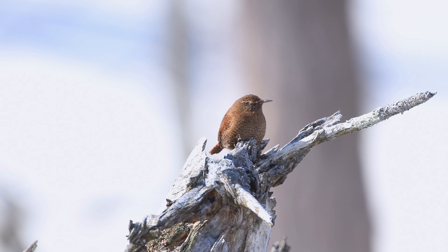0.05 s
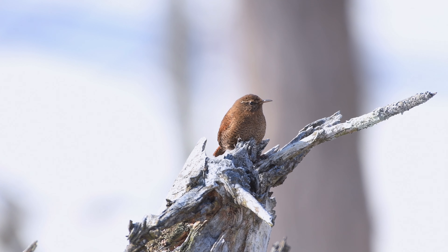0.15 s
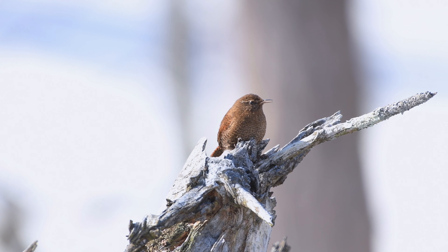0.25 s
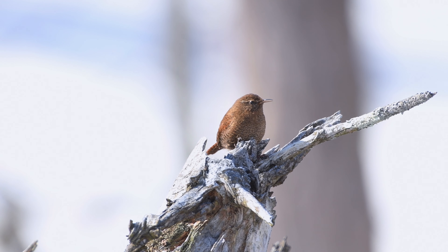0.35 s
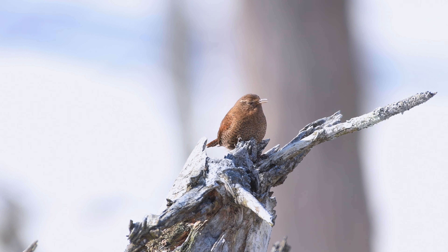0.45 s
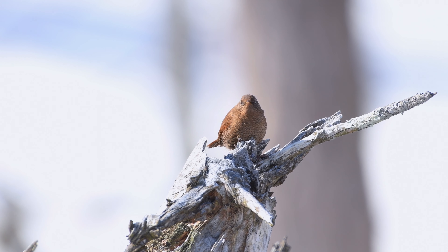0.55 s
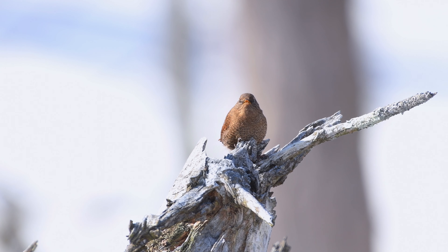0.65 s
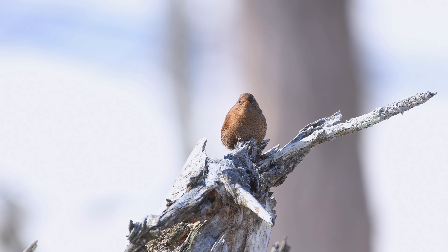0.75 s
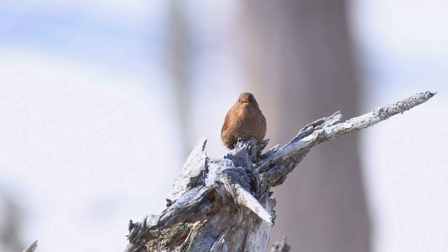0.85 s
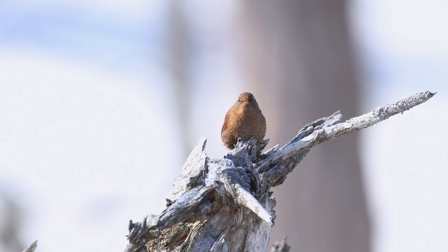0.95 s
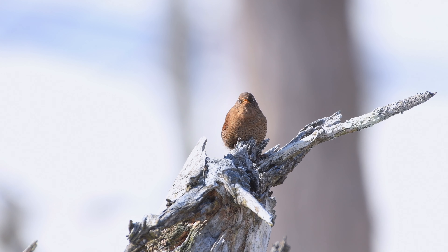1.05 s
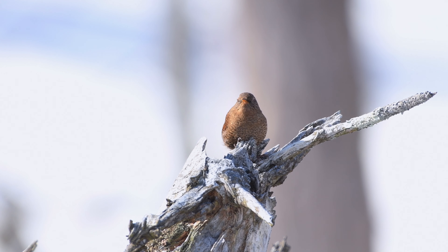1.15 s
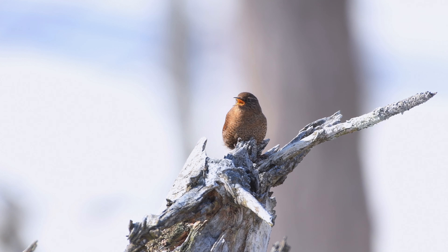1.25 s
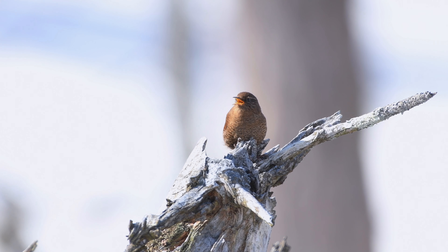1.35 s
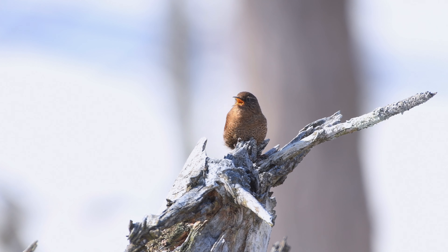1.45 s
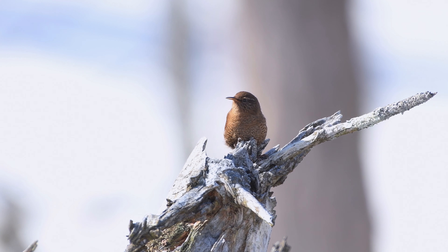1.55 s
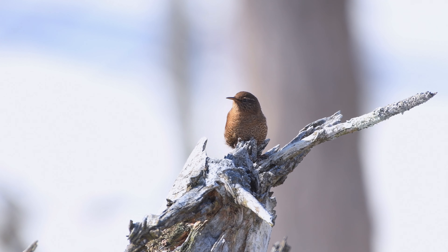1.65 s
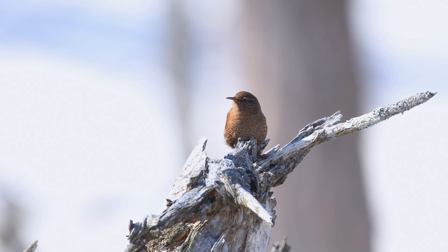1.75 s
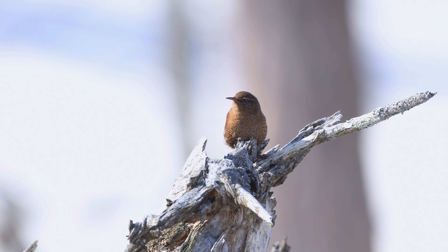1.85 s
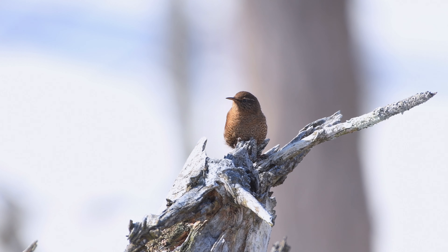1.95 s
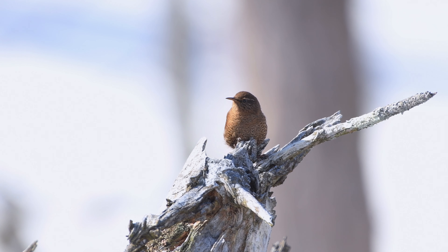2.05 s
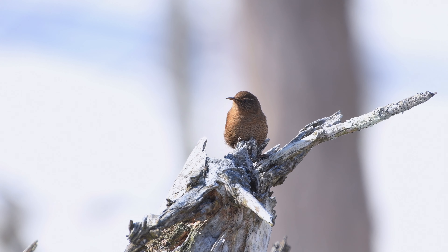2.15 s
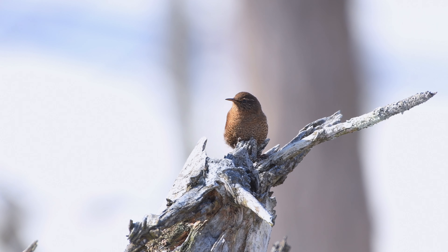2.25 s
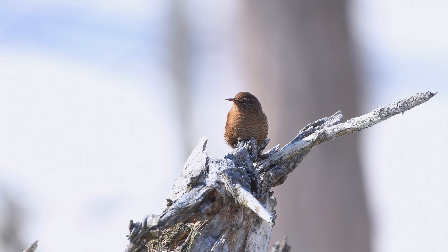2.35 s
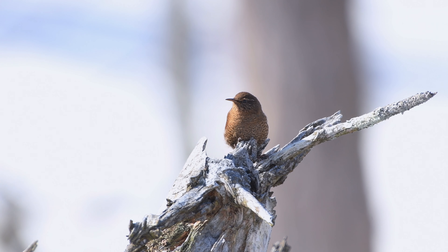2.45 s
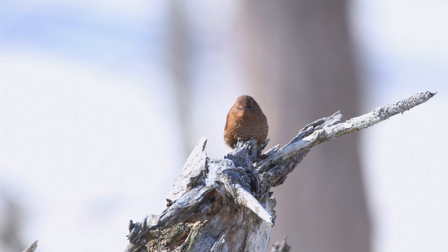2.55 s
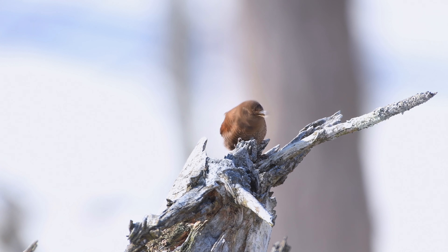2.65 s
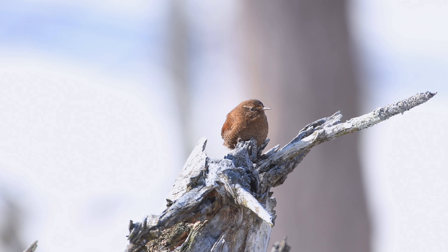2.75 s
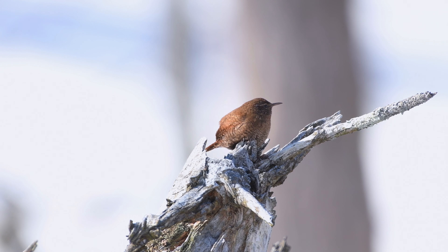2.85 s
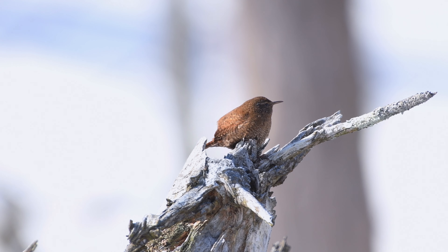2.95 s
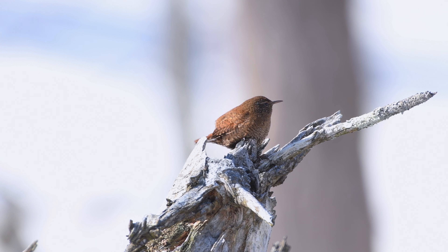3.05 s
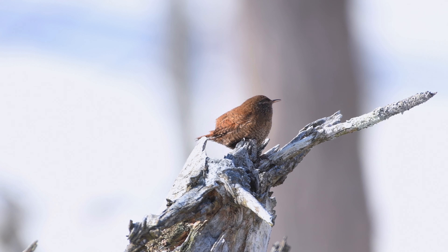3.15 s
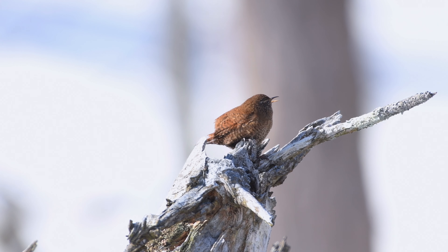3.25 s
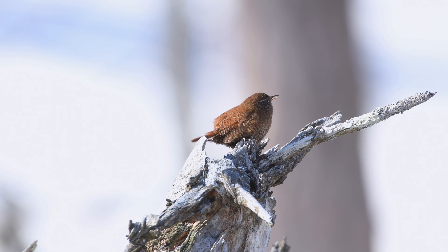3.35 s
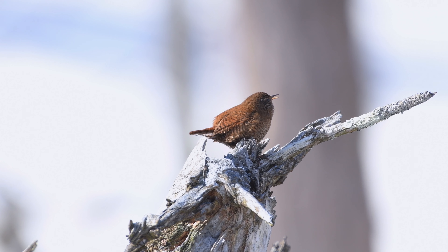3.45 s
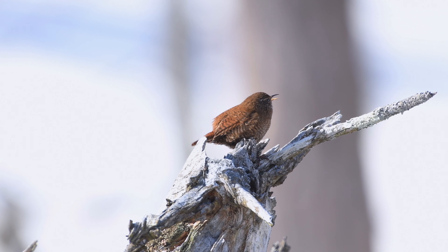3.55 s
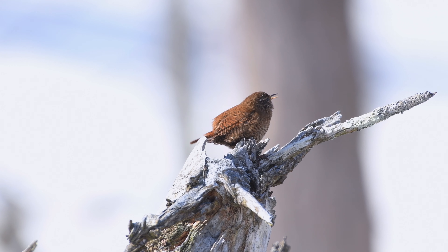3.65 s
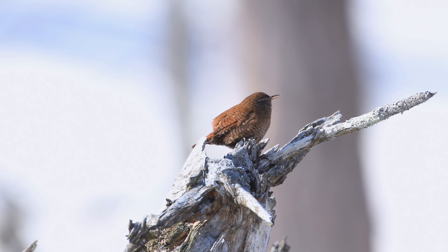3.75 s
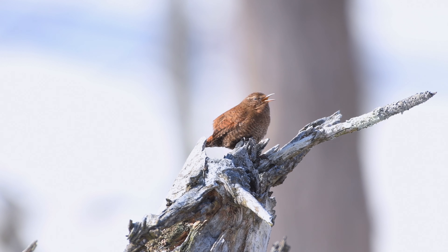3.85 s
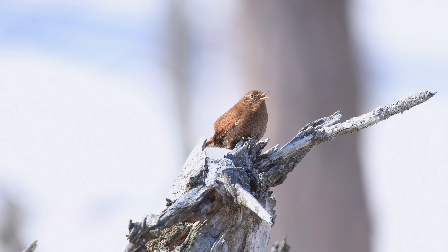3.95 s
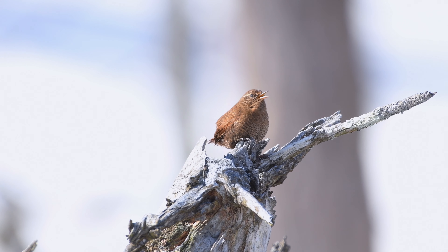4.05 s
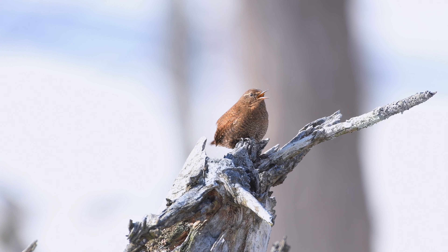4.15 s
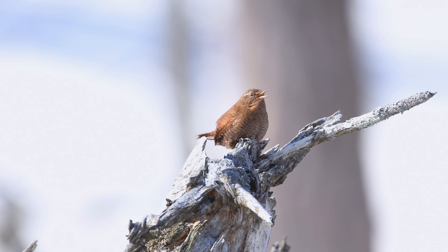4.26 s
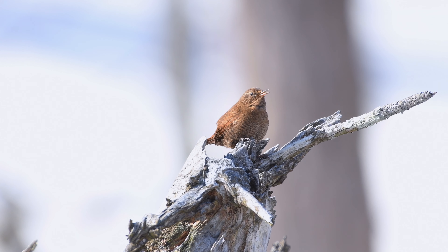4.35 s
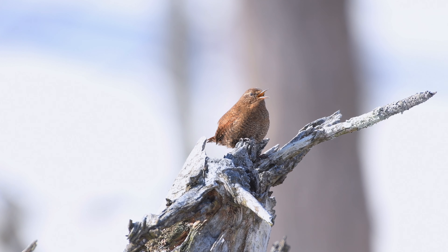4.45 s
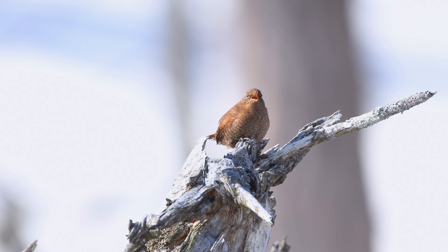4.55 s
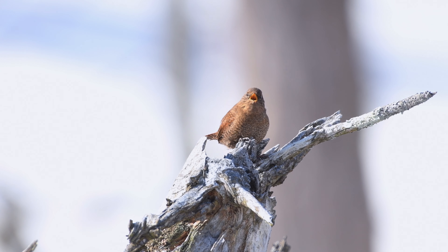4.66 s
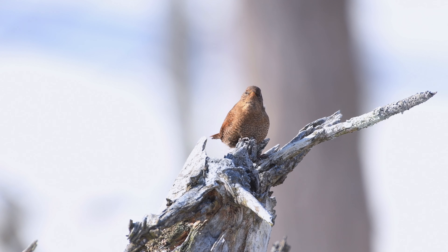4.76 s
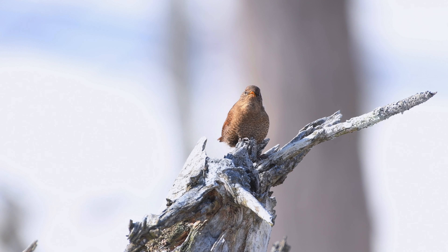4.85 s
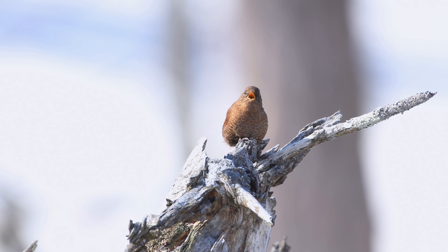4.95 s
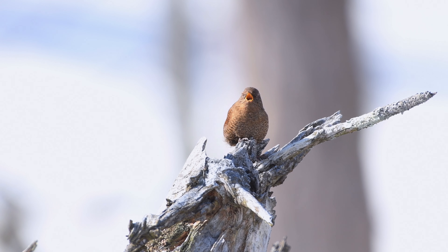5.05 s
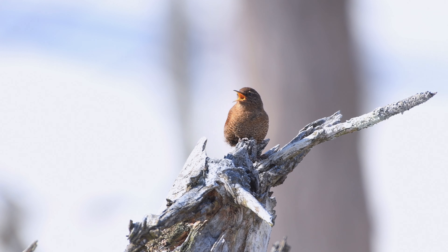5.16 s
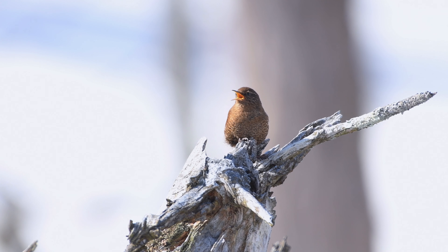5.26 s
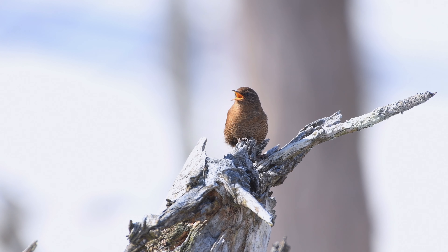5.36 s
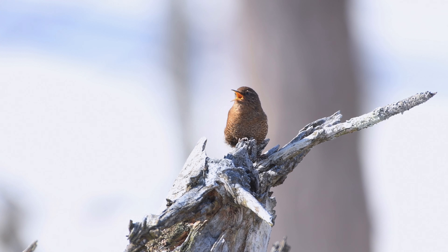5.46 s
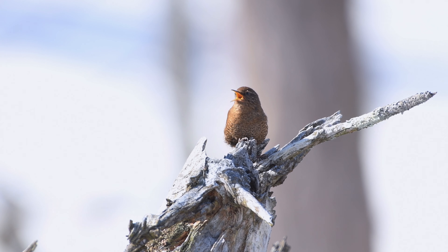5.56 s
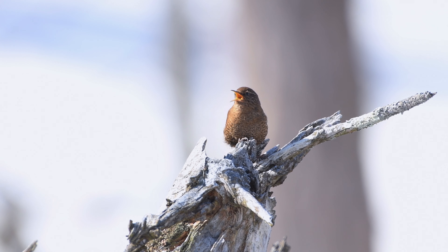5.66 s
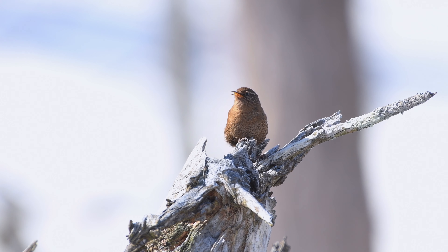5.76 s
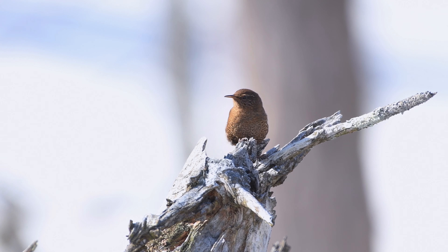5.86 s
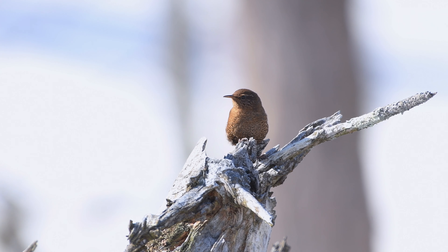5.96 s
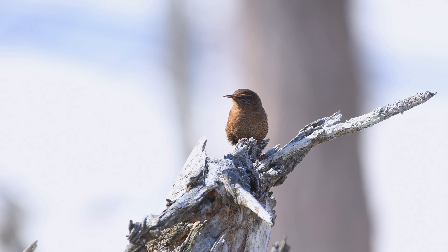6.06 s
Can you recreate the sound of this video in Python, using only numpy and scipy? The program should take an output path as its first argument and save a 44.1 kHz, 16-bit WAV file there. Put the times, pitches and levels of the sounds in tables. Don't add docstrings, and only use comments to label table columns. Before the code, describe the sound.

A wren sings alone in a clearing, a few metres from a stereo microphone. Distant low rumble, soft hiss and a very faint steady electronic whine lie underneath, and light wind bumps dully in irregular puffs, stronger near 0.3, 2.2 and 3.3 seconds. From 0.2 seconds come faint thin openers, then three quick whistled swoops, diving and climbing, between 0.5 and 1.05. A faint low note follows, then a high warble from 1.25 and a loud plunging whistle at 1.5 to 1.6. Only wind and hiss remain until 3.2, when the second phrase begins softly. Four swoops run from 3.5 to 4.3, growing stronger, then low wavers, rising warbles, a loud plunge at 4.75, and long, high, sagging notes from 5.0. Another plunge at 5.5 leads to three bright upward flicks, ending about 5.85. Short echoes from trunks blur each note; the wind fades.

```python
import sys
import numpy as np
from scipy import signal
from scipy.fft import rfft, irfft
from scipy.io import wavfile
from scipy.ndimage import uniform_filter1d

SR = 44100
rng = np.random.default_rng(int(sys.argv[2]) if len(sys.argv) > 2 else 0)


def waveform_to_disk(signal):
    frames = np.transpose(np.atleast_2d(signal))
    scaled = np.clip(frames, -1, 1) * 32767
    samples = np.round(scaled).astype(np.int16)
    wavfile.write(sys.argv[1], SR, samples)


def gain_from_decibels(decibels):
    exponent = np.asarray(decibels, float) / 20
    return 10 ** exponent


N = 268745


def evened(x):
    return x / np.sqrt(np.mean(x ** 2) + 1e-20)


def read_curve(points, hz):
    point_hz, value = np.transpose(points)
    return np.interp(np.log(hz + 1), np.log(point_hz + 1), value)


def over_time(points):
    return np.interp(np.arange(N) / SR, *np.transpose(points))


def drift(size, span_s):
    span = max(int(span_s * SR), 2)
    once = uniform_filter1d(rng.standard_normal(size), span)
    return evened(uniform_filter1d(once, span))


def noise(spectrum, likeness):
    hz = np.fft.rfftfreq(N, 1 / SR)
    a, b, c, d = rng.standard_normal((4, len(hz)))
    same = np.clip(likeness(hz), -1, 1)
    left = a + 1j * b
    right = same * left + np.sqrt(1 - same ** 2) * (c + 1j * d)
    bands = np.array([left, right]) * gain_from_decibels(read_curve(spectrum, hz))
    return evened(irfft(bands, N))


# (pitch_hz, level_db [dB per Hz])
AIR = [(20, -1.5), (50, -5.5), (110, -7), (335, -2), (358, 6), (385, -1.5), (700, -5), (1500, -5.5),
       (3500, -9), (6000, -10.5), (9000, -14.5), (13000, -16), (15700, -21)]
# (pitch_hz, likeness [1 = same])
LIKENESS = [(60, 0.96), (130, 0.98), (290, 1), (640, 0.69), (1410, -0.085), (3100, -0.087), (6820, 0.061),
            (15000, 0.053)]


def rumble_and_hiss():
    return gain_from_decibels(-63) * noise(AIR, lambda hz: read_curve(LIKENESS, hz))


# (multiple of the base pitch, level_db)
WHINE = [(2, -95), (3, -93), (4, -93), (5, -93), (9, -97), (10, -98), (11, -101), (12, -102)]


def whine():
    base_hz = 1170.3
    t = np.arange(N) / SR
    tones = np.zeros(N)
    for multiple, level_db in WHINE:
        tones += gain_from_decibels(level_db) * np.sin(2 * np.pi * (multiple * base_hz * t + rng.random()))
    return tones * gain_from_decibels(np.array([[6.5], [-1.5]]))


# (time_s, level_db)
GUSTS = [(0, -68), (0.3, -58.5), (0.55, -65), (0.85, -62.5), (1.2, -68.5), (1.6, -65.5), (1.95, -66.5),
         (2.2, -59), (2.65, -68.5), (2.85, -61.5), (3.3, -58), (3.65, -66.5), (4.15, -61), (4.4, -70.5),
         (4.8, -73), (5.5, -69), (6.09, -84)]
# (pitch_hz, level_db [dB per Hz])
WIND = [(12, -37.5), (20, -20), (76, 8.5), (225, -1), (252, -8.5), (311, -7.5), (376, -18.5), (400, -44),
        (520, -72), (880, -120)]
# (time_s, pitch_hz, peak_db)
PUFFS = [(0.293, 123, -52), (0.386, 130, -53), (0.441, 140, -48), (0.744, 150, -51.5), (0.829, 142, -47),
         (0.887, 117, -52.5), (0.97, 117, -53.5), (1.045, 98, -52), (1.349, 111, -51.5),
         (1.442, 101, -52.5), (1.606, 140, -52.5), (1.655, 117, -53.0), (2.031, 197, -42),
         (2.093, 143, -54), (2.174, 157, -50.5), (2.226, 125, -53), (2.395, 96, -51.5), (2.873, 180, -50.5),
         (2.917, 143, -55), (2.949, 148, -55), (3.062, 163, -53), (3.122, 134, -48), (3.196, 132, -52),
         (3.27, 135, -51), (3.327, 103, -48), (3.466, 139.8, -48.5), (3.846, 148, -53.0),
         (3.882, 215, -46.5), (3.942, 165, -50.5), (4.114, 116, -52), (4.159, 138, -51.0),
         (4.654, 98.4, -46), (4.705, 142, -44), (5.299, 146, -50.5), (5.533, 118, -51.5),
         (5.604, 143, -50.0),
         (0.235, 120, -53.0), (0.327, 101, -53.0), (0.42, 107, -51.0), (0.581, 134, -53.0),
               (2.151, 147, -51.0), (2.197, 117, -51.5), (2.211, 117, -53.0), (2.85, 160, -51.5),
               (3.132, 96, -50.5), (3.294, 104, -53.0), (3.304, 167, -53.0), (3.35, 129, -53.0),
               (4.215, 161, -56.5), (4.265, 133, -55.5), (4.435, 140, -58.0), (4.488, 102, -57.5),
               (4.588, 84, -58.0), (4.626, 121, -49.0), (4.642, 94, -51.5), (4.72, 131, -46.5),
               (4.733, 137, -50.5), (4.755, 88, -57.5), (4.885, 104, -54.5), (4.933, 153, -58.0),
               (5.051, 141, -54.5), (5.149, 115, -57.0), (5.361, 96, -58.0), (5.5, 160, -56.5)]


def wind(lumps_db=2.5, lump_s=0.0079, eddy_db=0.5, eddy_s=0.11, breeze_db=-2.5):
    lumps = noise(WIND, lambda hz: 1 + 0 * hz) * gain_from_decibels(lumps_db * drift(N, lump_s))
    strength_db = over_time(GUSTS) + breeze_db + eddy_db * drift(N, eddy_s)
    out = evened(lumps) * gain_from_decibels(strength_db)
    for time_s, pitch_hz, peak_db in PUFFS:
        at = round(time_s * SR)
        cycles = np.arange(-2000, 2000) / SR * pitch_hz
        bell = np.exp(-(cycles / 0.63) ** 2)
        out[:, at - 2000:at + 2000] += gain_from_decibels(peak_db) * bell * np.cos(2 * np.pi * (cycles + rng.random()))
    return out


# (delay_s, left_db, right_db)
TRUNKS = [(.0024, -14, -20.5), (.0037, -23.5, -15.5), (.0044, -16.5, -23.5), (.0059, -26, -21),
          (.0075, -22.5, -26.5), (.01, -25.5, -16.5), (0.0111, -19.5, -25), (.016, -27, -20),
          (0.0175, -19.5, -25.5), (.0235, -26, -22), (.0283, -29, -20.5), (.036, -25, -27.5),
          (.052, -32.5, -32.5)]
# (pitch_hz, time_s to fade by 60 dB)
WOODS = [(3000, 0.76), (5000, 0.76), (7000, 0.51), (10000, 0.16)]
# (time_s, level_db)
TOWARD_TREES = [(0.3, -2), (0.6, -1.5), (0.8, -1.5), (1.0, -1), (1.2, -2), (1.55, -0.5), (3.3, -1.5),
                (3.6, -2), (3.8, -2), (4.0, -2.5), (4.2, -3), (4.4, -2), (4.6, -1), (4.78, -0.5),
                (4.92, -0.5), (5.2, -1), (5.53, 0.5), (5.8, -1)]


def clearing(song, tail_db=-18, build_s=0.006, bark_s=0.00035):
    treeline_s, beyond_db_per_s = 0.22, -130
    hz, t, bands = signal.stft(rng.standard_normal((2, SR)), SR, nperseg=256)
    decay_db = -60 * t / read_curve(WOODS, hz)[:, None]
    decay_db = decay_db + beyond_db_per_s * np.maximum(t - treeline_s, 0)
    tail = signal.istft(bands * gain_from_decibels(decay_db), SR, nperseg=256)[1][:, :SR]
    tail = tail * (1 - np.exp(-np.arange(SR) / SR / build_s))
    echoes = gain_from_decibels(tail_db) * tail / np.linalg.norm(tail[0])
    for delay_s, left_db, right_db in TRUNKS:
        smear = rng.standard_normal(64) * np.exp(-np.arange(64) / SR / bark_s)
        song_band = abs(rfft(smear, 256))[25:42]
        smear = smear / np.sqrt(np.mean(song_band ** 2))
        at = round(delay_s * SR)
        echoes[:, at:at + len(smear)] += gain_from_decibels(np.array([[left_db], [right_db]])) * smear
    sent = song * gain_from_decibels(over_time(TOWARD_TREES))
    return signal.fftconvolve(sent[None], echoes, axes=1)[:, :N]


# (time_s, pitch_hz, level_db, length_s)
TICKS = [(1.108, 5900, -64, 0.0037), (1.115, 4570, -55, 0.0065), (1.123, 4750, -55, 0.0056),
         (3.472, 5540, -51.5, 0.0036), (4.366, 4700, -53, 0.0018), (4.366, 4700, -51, 0.0018),
         (4.887, 3600, -59, 0.0015), (4.88, 4400, -60, .003), (5.612, 4800, -50, .0015),
         (4.739, 5200, -52, .001), (4.94, 3800, -56, .002), (5.611, 3500, -57, 0.0033),
         (5.612, 6000, -45, 0.001), (5.615, 6870, -48, 0.002), (0.664, 7200, -56, .002),
         (3.848, 6300, -52, .003), (5.153, 5500, -55, .001), (3.981, 6600, -36, .006),
         (4.288, 6900, -35, .006)]


def ticks():
    out = np.zeros(N)
    for time_s, pitch_hz, level_db, length_s in TICKS:
        t = np.arange(-3 * length_s, 3 * length_s, 1 / SR)
        bell = np.exp(-(4 * t / length_s) ** 2)
        at = round(time_s * SR) - len(t) // 2
        out[at:at + len(t)] += gain_from_decibels(level_db) * np.sin(2 * np.pi * pitch_hz * t) * bell
    return out


# (pitch_hz, level_db)
OVERTONE = [(3500, -43), (4500, -25), (5600, -38.5), (6100, -54), (7000, -66)]
# (time_s, added_db)
TOWARD_CAMERA = [(0, -15), (1.5, -6.5), (1.6, -1), (3.3, -21), (4.7, -8.5), (5.0, -16.5), (5.48, 10), (5.55, 11),
                 (5.63, 8.5), (5.9, 1)]


def syllable(rows, wobble=0.0015, flutter_db=0.8, edge_s=0.0035):
    s, hz, effort_db = np.transpose(rows)
    t = np.arange(s[0], s[-1], 1 / SR)
    path_hz = uniform_filter1d(np.interp(t, s, hz), size=160)
    hz = uniform_filter1d(path_hz, size=110) * (1 + wobble * drift(len(t), 0.0031))
    effort_db = uniform_filter1d(np.interp(t, s, effort_db), size=100)
    effort_db = effort_db + flutter_db * drift(len(t), 0.0015)
    phase = 2 * np.pi * np.cumsum(hz) / SR
    overtone_db = read_curve(OVERTONE, hz) + np.interp(t, *np.transpose(TOWARD_CAMERA))
    tone = np.sin(phase) + gain_from_decibels(overtone_db) * np.sin(2 * phase)
    edges = np.clip(np.minimum(t - t[0], t[-1] - t) / edge_s, 0, 1)
    return np.sqrt(2) * gain_from_decibels(effort_db) * tone * np.sin(np.pi / 2 * edges) ** 2


# (share of length, share of pitch span, level_db against the effort)
RISE = [(0, 0.016, -13), (0.3, 0.154, -1), (0.5, 0.42, 1), (0.88, 1, -11), (1, 1, -4)]
FLICK = [(0, 0.053, -48.5), (0.25, 0.232, -21), (0.5, 0.75, -6.5), (0.74, 0.98, -1), (1, 0.95, -13.5)]
HOOK = [(0, 0, -3), (0.22, 0, -2), (0.52, 0.15, -0.5), (0.8, 0.55, -3.5), (1, 1, -3.5)]
BLIP = [(0, 0.93, -12), (0.42, 0.041, 3.5), (0.75, 0.3, 0), (1, 0.7, -23)]
# (start_s, length_s, pitch_hz at share 0, pitch_hz at share 1, effort_db)
RISES = [
    (0.21, 0.052, 4580, 5640, -63),
    (3.215, 0.05, 4730, 5620, -48.5),
]
FLICKS = [
    (5.609, 0.032, 3750, 6330, -25.5),
    (5.707, 0.029, 3720, 6200, -27.5),
    (5.806, 0.026, 3980, 6050, -30),
]
HOOKS = [(3.664, 0.022, 6380, 6820, -48)]
BLIPS = [(5.72, 0.022, 7100, 7050, -53), (5.842, 0.016, 5880, 5800, -46.5), (5.704, 0.014, 7050, 5400, -59),
         (5.745, 0.02, 7200, 7300, -58)]


def short_notes():
    notes = []
    for shape, table in zip((RISE, FLICK, HOOK, BLIP), (RISES, FLICKS, HOOKS, BLIPS)):
        for start, length, hz0, hz1, effort_db in table:
            points = [(start + u * length, hz0 + share * (hz1 - hz0), effort_db + db) for u, share, db in shape]
            notes.append(sorted(points))
    return notes


# (start_s, start_hz, dive_s, level_db against full effort at the dive)
LEADS = [(0.515, 6780, 0.5256, -12), (0.711, 5530, 0.722, -8), (0.905, 6440, 0.917, -8),
         (3.519, 5950, 3.535, -2), (3.729, 5730, 3.735, -6), (3.91, 5650, 3.921, -13.5),
         (4.119, 6130, 4.127, -3)]
# (bottom_s, entry_hz, bottom_hz, effort_db, climb_effort_db)
DIPS = [(0.55, 6400, 5670, -38.5, -50.5), (0.738, 5750, 5040, -38.5, -43.5),
        (0.937, 5800, 4760, -34.5, -40.5), (3.557, 6200, 4800, -37.5, -52), (3.752, 5750, 4803, -40.5, -54),
        (3.946, 5780, 4817, -36, -31.5), (4.15, 5980, 4653, -36.5, -30.5)]
# (time_s, pitch_hz, break_db against the crest, catch_hz after it)
KNEES = [(0.573, 7000, -7, 6900), (0.76, 6330, -3, 6530), (0.963, 6390, -9, 7300), (3.579, 6500, -11, 7000),
         (3.777, 6560, -8, 6940), (3.971, 6470, -4, 6800), (4.173, 6400, -6, 7150)]
# (reach_s, crest_hz, leave_s, leave_hz, effort_db)
CRESTS = [(0.59, 7220, 0.6, 7180, -59), (0.782, 6950, 0.789, 6850, -55.5), (0.98, 7510, 1.003, 7420, -50.5),
          (3.592, 7180, 3.604, 7170, -53.5), (3.795, 7220, 3.803, 7120, -59.5),
          (3.995, 7050, 4.006, 6950, -44.5), (4.181, 7040, 4.198, 6850, -39.5)]
# (time_s, pitch_hz, effort_db)
LANDINGS = [(0.621, 6580, -58), (0.799, 6440, -48), (1.016, 6850, -41), (3.62, 6750, -45),
            (3.823, 6720, -45), (4.027, 6330, -39), (4.213, 6940, -38)]
# (lowest_s, lowest_hz, effort_db, end_s, end_hz)
SHELVES = [(0.647, 6440, -51, 0.668, 6880), (0.832, 6260, -44, 0.856, 6490),
           (1.03, 6690, -39.5, 1.048, 6920), (3.638, 6610, -48.5, 3.655, 6540),
           (3.832, 6670, -48, 3.858, 6610), (4.042, 6210, -33.5, 4.076, 6414),
           (4.267, 6276, -31.5, 4.29, 6780)]
# (bottom_db, catch_db, slack_db, end_db)
SHADES = [(-1, -6, 0, -3), (2, -4, 1.5, -7), (0.5, -4, -6, -9), (-2.5, -1, -3, -10), (0.5, -5, 0, -10),
          (2, -9, -1, 0), (0, -17, -6, -10)]
# (swell_s, fade_s)
SWELLS = [(0.64, 0.66), (0.825, 0.846), (1.022, 1.041), (3.63, 3.645), (3.825, 3.845), (4.036, 4.07),
          (4.258, 4.281)]


def swoop(lead, dip, knee, crest, landing, shelf, shade, swell):
    start_s, start_hz, dive_s, under_db = lead
    s, entry_hz, bottom_hz, db, climb_db = dip
    knee_s, knee_hz, break_db, catch_hz = knee
    top_s, top_hz, leave_s, leave_hz, top_db = crest
    land_s, land_hz, land_db = landing
    low_s, low_hz, low_db, end_s, end_hz = shelf
    bottom_db, catch_db, slack_db, end_db = shade
    swell_s, fade_s = swell
    rest_s = 0.003
    catch_s = 0.0067
    full_share = 0.44
    full_s = dive_s + full_share * (s - dive_s)
    full_hz = entry_hz + full_share * (bottom_hz - entry_hz)
    break_s = knee_s + 0.53 * (top_s - knee_s)
    slack_s = max(swell_s - catch_s, land_s + rest_s)

    def shelf_hz(t):
        return np.interp(t, [land_s, low_s, end_s], [land_hz, low_hz, end_hz])

    return sorted([
        (start_s, start_hz, db - 24.5),
        (dive_s, entry_hz, db + under_db),
        (full_s, full_hz, db),
        (s - rest_s, bottom_hz, db + bottom_db),
        (s + rest_s, bottom_hz, db + bottom_db),
        (s + rest_s + 0.0039, bottom_hz + 298, db),
        (knee_s, knee_hz, climb_db),
        (break_s, (knee_hz + 2 * top_hz) / 3, top_db + break_db),
        (top_s, top_hz, top_db),
        (leave_s, leave_hz, top_db),
        (leave_s + catch_s, catch_hz, top_db + catch_db),
        (land_s, land_hz, land_db),
        (slack_s, shelf_hz(slack_s) - 60, land_db + slack_db),
        (swell_s, shelf_hz(swell_s), low_db),
        (low_s, low_hz, low_db),
        (fade_s, shelf_hz(fade_s), low_db),
        (end_s, end_hz, low_db + end_db)])


# (time_s, pitch_hz, effort_db)
SLIDES = [
    [(0.338, 7500, -81), (0.37, 7180, -59.5), (0.383, 7000, -64), (0.426, 7060, -61), (0.449, 7040, -62),
     (0.464, 7320, -74)],
    [(3.326, 8600, -68), (3.353, 7600, -63), (3.367, 7470, -54.5), (3.399, 7270, -63), (3.409, 7240, -54),
     (3.425, 7140, -60), (3.445, 6820, -57), (3.468, 7150, -63)],
]
PEEPS = [
    [(4.343, 6620, -56), (4.35, 6390, -39), (4.355, 6240, -36.5), (4.357, 6270, -40), (4.361, 6330, -37.5),
     (4.367, 6470, -48)],
    [(4.464, 3980, -57), (4.468, 4060, -53), (4.472, 3940, -52), (4.475, 4010, -53), (4.479, 4000, -59)],
    [(5.655, 6210, -43), (5.664, 6200, -38), (5.674, 6100, -24), (5.679, 6240, -28.5), (5.682, 6280, -43),
     (5.688, 6170, -40), (5.696, 6150, -43), (5.704, 6020, -48)],
    [(5.743, 6030, -47), (5.753, 6150, -33), (5.765, 6220, -29), (5.773, 6430, -30), (5.781, 6720, -39)],
]
PLUNGES = [
    [(1.516, 6230, -59), (1.528, 6240, -34.5), (1.54, 5880, -36), (1.554, 5860, -25), (1.574, 5896, -30.5),
     (1.588, 4800, -42), (1.6, 3930, -45.5), (1.605, 3820, -58), (1.613, 4540, -44.5)],
    [(4.736, 6840, -49), (4.75, 6390, -29.5), (4.761, 5750, -26.5), (4.773, 5620, -30), (4.786, 6096, -25),
     (4.795, 6104, -25.5), (4.816, 4510, -38), (4.829, 4040, -52), (4.838, 3440, -65)],
    [(5.495, 6100, -46), (5.501, 6460, -37), (5.506, 6370, -29.5), (5.513, 6000, -29.5),
     (5.544, 5643, -31.5), (5.556, 5200, -35.5), (5.564, 4840, -39.5), (5.57, 4840, -46),
     (5.577, 3750, -65)],
]
WARBLES = [
    [(1.25, 6050, -61), (1.259, 7000, -59), (1.272, 7460, -52), (1.302, 7340, -43.5), (1.318, 7650, -45.5),
     (1.35, 7384, -41), (1.376, 7610, -40.5), (1.404, 7480, -43.5), (1.421, 8030, -39)],
    [(1.42, 7680, -58.5), (1.45, 7510, -40), (1.462, 7100, -57.5)],
    [(4.533, 6980, -57), (4.54, 6700, -43.5), (4.552, 7000, -41.5), (4.558, 7160, -47),
     (4.564, 7310, -42.5), (4.581, 7730, -42), (4.587, 7750, -48)],
    [(4.586, 7800, -48), (4.592, 7950, -43), (4.6, 8220, -48), (4.633, 7780, -38.5), (4.644, 7850, -55),
     (4.652, 7730, -36), (4.684, 8300, -43), (4.698, 8320, -56)],
]
SAGS = [
    [(4.99, 7900, -67), (4.999, 7790, -46.5), (5.015, 7640, -37.5), (5.024, 7930, -50),
     (5.036, 6990, -36.5), (5.052, 6843, -35.5), (5.092, 6980, -32.5), (5.103, 7390, -40),
     (5.11, 6870, -56)],
    [(5.156, 7870, -65), (5.164, 7410, -38.5), (5.187, 7200, -35.5), (5.205, 7240, -41), (5.227, 7070, -37),
     (5.258, 7520, -37), (5.276, 7680, -34), (5.293, 7600, -40.5), (5.303, 6720, -43.5)],
    [(5.349, 6960, -78), (5.363, 7650, -41.5), (5.376, 7740, -35), (5.385, 7700, -55), (5.406, 7920, -44),
     (5.421, 7660, -44), (5.429, 7490, -34.5), (5.445, 7840, -36), (5.453, 6730, -61)],
]
LOW_NOTES = [
    [(1.122, 4500, -70), (1.128, 4280, -54), (1.138, 3980, -56.5), (1.15, 3930, -58), (1.16, 3760, -57),
     (1.17, 3720, -51.5), (1.184, 3900, -59), (1.196, 3900, -59), (1.204, 3600, -67)],
    [(4.367, 4310, -58.5), (4.377, 4050, -48.5), (4.395, 4032, -43.5), (4.411, 3794, -52),
     (4.419, 4080, -47), (4.447, 3805, -50.5), (4.456, 3850, -52), (4.459, 3640, -61), (4.464, 3550, -55)],
    [(4.886, 4350, -66), (4.895, 4180, -52), (4.901, 4245, -43), (4.909, 4510, -36), (4.914, 4485, -34.5),
     (4.921, 4280, -39), (4.931, 4494, -35.5), (4.936, 4413, -34.5), (4.94, 4250, -45)],
]


def wren():
    swoops = list(map(swoop, LEADS, DIPS, KNEES, CRESTS, LANDINGS, SHELVES, SHADES, SWELLS))
    clear = swoops + PEEPS + short_notes() + SLIDES + PLUNGES + WARBLES + SAGS
    sung = [(rows, syllable(rows)) for rows in clear]
    sung += [(rows, syllable(rows, wobble=0.001, flutter_db=0.6)) for rows in LOW_NOTES]
    song = np.zeros(N)
    for rows, sound in sung:
        at = round(rows[0][0] * SR)
        song[at:at + len(sound)] += sound
    return song


# (time_s, left_minus_right_db)
FACING = [(0.2, 6), (0.37, 0), (0.65, 0), (1.342, 4), (1.504, -3.5), (1.616, 5.5), (3.2, 5.5), (3.41, -0.5),
          (4.01, 1), (4.11, 3.5), (4.3, -2), (4.45, 3), (4.85, 0.5), (4.94, 8.5), (5.0, -2), (5.12, 7.5),
          (5.21, -2), (5.6, 1)]


def scene():
    song = wren() + ticks()
    pan_db = over_time(FACING)
    direct = song * gain_from_decibels(np.array([pan_db, -pan_db]) / 2)
    direct[0] = np.roll(direct[0], 1)
    return direct + clearing(song) + wind() + rumble_and_hiss() + whine()


# (pitch_hz, half_width_hz)
NOTCHES = [(2600, 364), (7700, 394)]


def notch_filters(x):
    for pitch_hz, half_width_hz in NOTCHES:
        x = signal.lfilter(*signal.iirnotch(pitch_hz, pitch_hz / (2 * half_width_hz), SR), x)
    return x


# (pitch_hz, level_db)
QUIET = [(2600, -88), (5000, -92), (7700, -91), (11000, -98), (14500, -98), (15700, -93)]


def drop_hidden_bands(x, margin_db=11, upward_db=60, downward_db=300, release_db=0.9, knee_db=0.4):
    hz, t, bands = signal.stft(x, SR, nperseg=1024, noverlap=768)
    power = uniform_filter1d((abs(bands) ** 2).mean(0), size=9, axis=0)
    band_db = 10 * np.log10(power * 7 + 1e-14)
    octave = np.log2(hz + 500)[:, None]
    up, down = upward_db * octave, downward_db * octave
    from_below = np.maximum.accumulate(band_db + up) - up
    from_above = np.maximum.accumulate((band_db - down)[::-1])[::-1] + down
    mask_db = np.maximum(from_below, from_above) - margin_db
    fall = release_db * np.arange(len(t))
    lingering_db = np.maximum.accumulate(mask_db + fall, axis=1) - fall - 19
    mask_db = np.maximum(lingering_db, mask_db)
    mask_db = np.where(hz[:, None] > 6300, mask_db, -120)
    limit_db = np.maximum(mask_db, read_curve(QUIET, hz)[:, None])
    keep = 1 / (1 + np.exp(np.clip((limit_db - band_db) / knee_db, -30, 30)))
    keep = np.where(hz[:, None] > 2000, keep, 1)
    return signal.istft(bands * keep, SR, nperseg=1024, noverlap=768)[1][:, :N]


def cut_top(x):
    return irfft(rfft(x) * (np.fft.rfftfreq(N, 1 / SR) < 15690), N)


def roll_off(x):
    return signal.sosfilt(signal.butter(12, 15650, fs=SR, output="sos"), x)


def record(dry):
    out = notch_filters(dry)
    out = drop_hidden_bands(out)
    out = cut_top(out)
    return roll_off(out)


dry = scene()
out = record(dry)
waveform_to_disk(out)
```